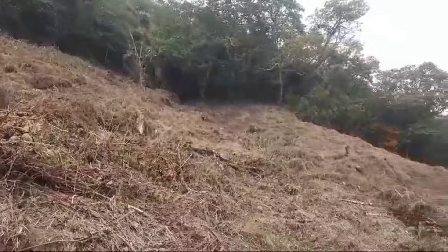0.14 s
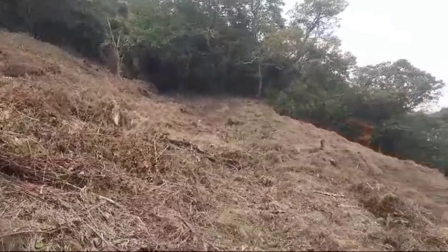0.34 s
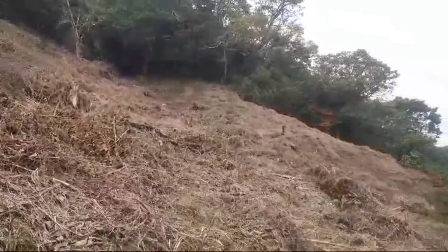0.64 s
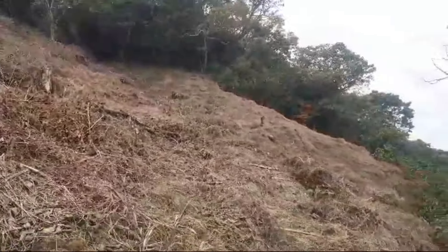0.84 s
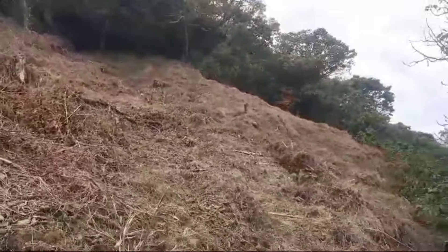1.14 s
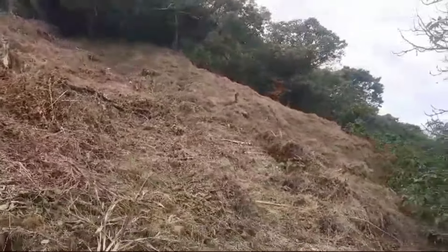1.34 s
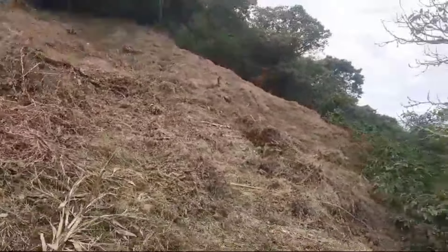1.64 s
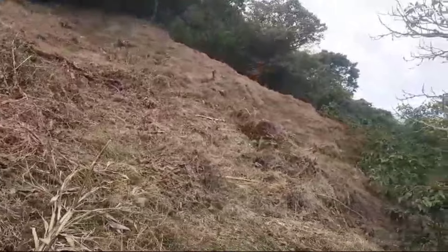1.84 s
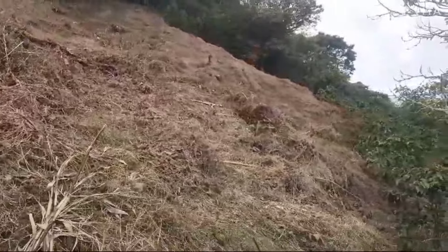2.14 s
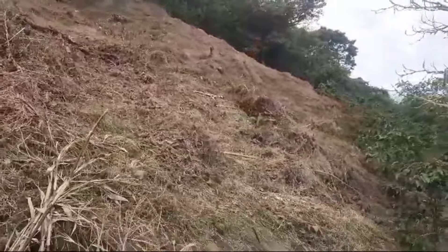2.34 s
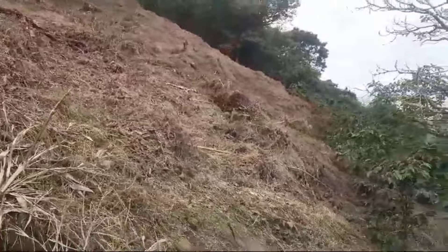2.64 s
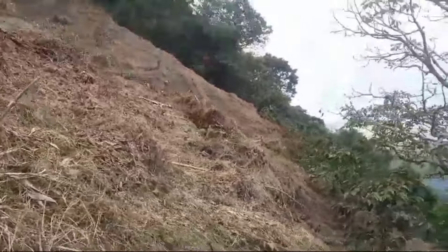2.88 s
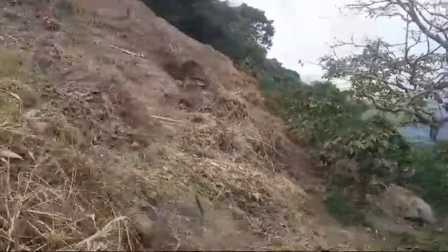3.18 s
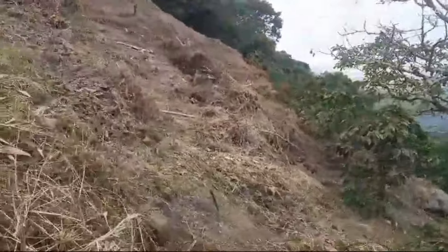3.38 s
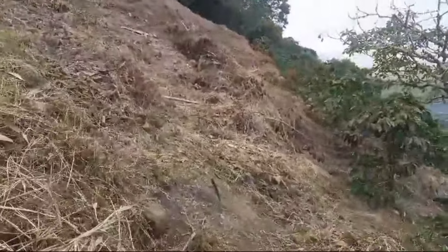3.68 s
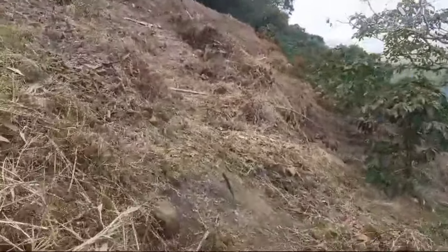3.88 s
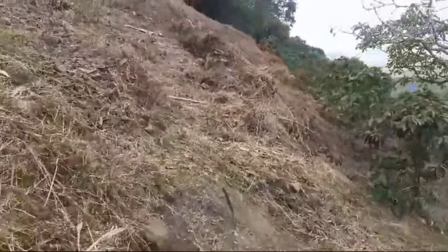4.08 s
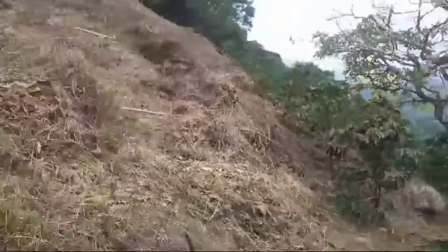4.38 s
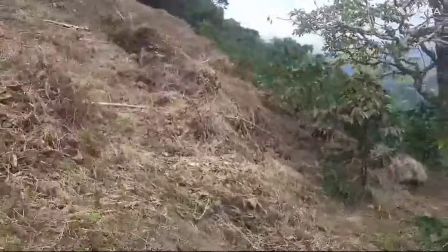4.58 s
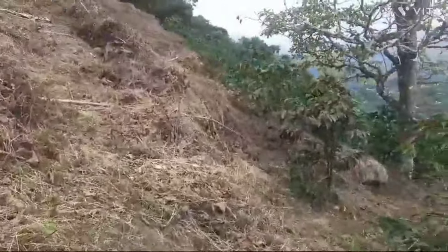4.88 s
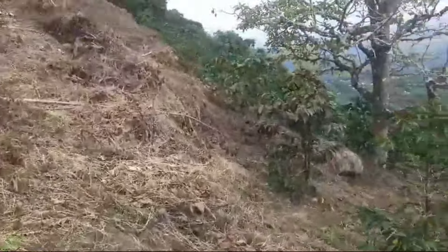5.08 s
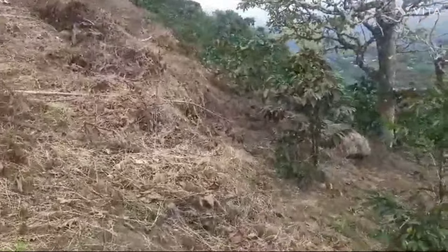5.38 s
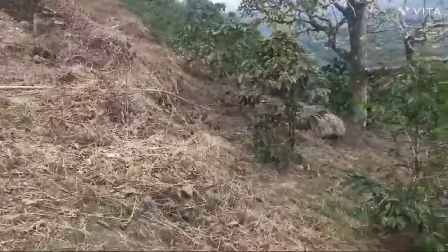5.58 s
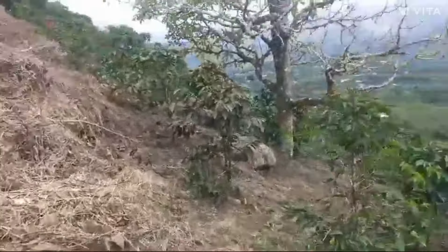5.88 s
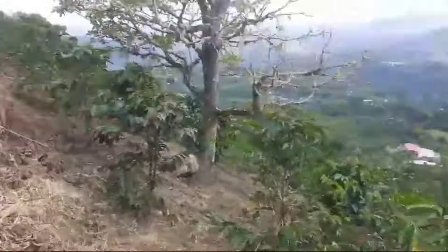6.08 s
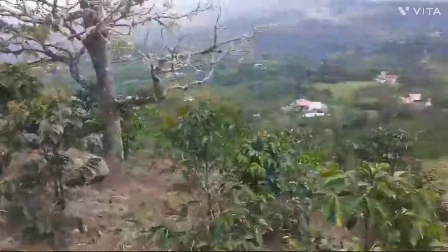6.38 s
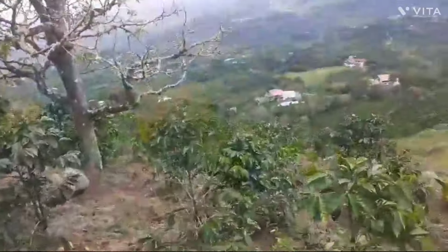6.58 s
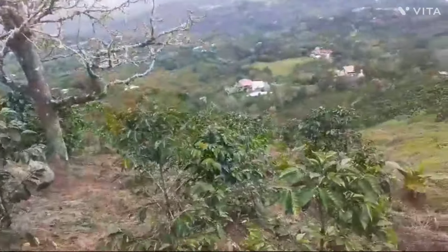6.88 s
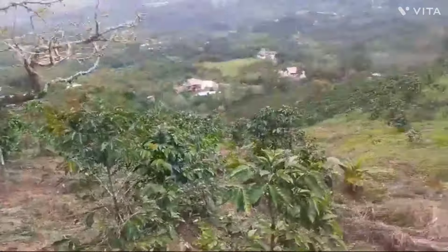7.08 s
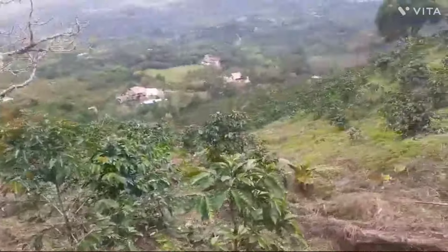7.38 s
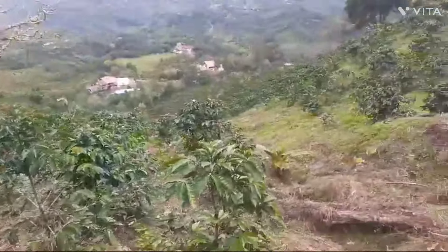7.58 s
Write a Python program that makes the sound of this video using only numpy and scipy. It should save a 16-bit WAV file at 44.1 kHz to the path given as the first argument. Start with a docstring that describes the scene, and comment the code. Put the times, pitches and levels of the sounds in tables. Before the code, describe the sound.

Someone pushes through cut, dead brush on an open hillside, very close to a phone's stereo microphones. Dull wind rumbles and pops come first, leaning right, with small crackles. A sharp, bright surge of twig snaps and crunching follows, then another short crunch and near quiet. Later the grip shifts: hollow taps and thuds on the case, skin rubbing and short rasps over sparse leaf rustle. No room echo.

```python
"""Dry cut brush crackles in surges as someone wades through it on an open hillside, phone in hand.
Random tiny breaks make the crackle; filtered bursts make snapping twigs and crunching bundles.
Wind, made of dull shaped noise and pops, buffets the right microphone at first.
Later the hand shifts its grip: knocks ring the phone's case and shake it, and fingers rub and rasp.
Dry blades swish, faint thin tones hang in a lull, and soft background noise lies under it all."""
import sys
import numpy as np
from scipy import signal
from scipy.fft import rfft, irfft, next_fast_len
from scipy.io import wavfile
from scipy.ndimage import uniform_filter1d

SR = 44100
rng = np.random.default_rng(int(sys.argv[2]) if len(sys.argv) > 2 else 0)


def to_wav(sig):
    """Store sig (one row per channel, or 1-D mono) as 16-bit WAV at the path in sys.argv[1].

    Samples outside -1..1 are clipped; the rate is SR.
    """
    pcm = np.clip(np.atleast_2d(sig), -1, 1) * 32767
    pcm = np.round(pcm).astype(np.int16)
    wavfile.write(sys.argv[1], SR, pcm.T)  # frames by channels


N = 340893
TIME = np.arange(N) / SR


def undb(db):
    """Turn decibels into gain."""
    return 10 ** (np.asarray(db) / 20)


def unit(x):
    """Scale a sound to an rms of one."""
    return x / np.sqrt(np.mean(x ** 2))


def total_db(gains):
    """Level of unrelated sounds heard together: their powers add."""
    return 10 * np.log10(sum(g ** 2 for g in gains) + 1e-12)


def colour(x, table):
    """Shape the tone through (Hz, dB) points, one dB column per channel, without sounding early."""
    hz, *columns = np.transpose(table)
    size = 4096
    log_hz = np.log(np.maximum(np.fft.rfftfreq(size, 1 / SR), 1))
    gains = undb([np.interp(log_hz, np.log(hz), c) for c in columns])
    # folding the cepstrum puts the filter's energy as early as possible
    cepstrum = irfft(np.log(gains))
    cepstrum[:, 1:size // 2] *= 2
    cepstrum[:, size // 2 + 1:] = 0
    response = irfft(np.exp(rfft(cepstrum)))
    return signal.fftconvolve(x, response, axes=-1)[:, :N]


def band(x, hz, kind, order=4):
    """Keep part of the pitch range with a Butterworth filter."""
    return signal.sosfilt(signal.butter(order, hz, kind, fs=SR, output="sos"), x)


def walk(rate):
    """Wander smoothly between random levels, rate of them a second, with a spread near one."""
    k = max(int(SR / rate), 1)
    steps = np.repeat(rng.standard_normal(N // k + 1), k)
    return 1.2 * uniform_filter1d(steps, k)[:N]


def swell(s, length_s, attack_s, release_db_per_s):
    """Gain of one gesture: it rises, holds until its length is over and dies away."""
    gain = np.zeros(N)
    span = slice(max(int(s * SR), 0), int((s + length_s + 1) * SR))
    t = TIME[span] - s
    gain[span] = np.clip(t / attack_s, 0, 1) * undb(-release_db_per_s * np.maximum(t - length_s, 0))
    return gain


def pair(three, likeness):
    """Two microphones hear one shared signal and one of their own each."""
    likeness = np.clip(likeness, 0, 1)
    return np.sqrt(likeness) * three[0] + np.sqrt(1 - likeness) * three[1:]


def add(out, s, sound):
    """Mix a short stereo sound in at time s."""
    start = max(int(s * SR), 0)
    room = out[:, start:start + sound.shape[1]]
    room += sound[:, :room.shape[1]]


def blurred(hz, width_hz):
    """Noise in one narrow band around a pitch, which may move."""
    wobble = band(rng.standard_normal((2, N)), np.clip(width_hz / 2, 5, SR / 4), "lowpass")
    phase = 2 * np.pi * np.cumsum(hz * np.ones(N)) / SR
    return unit(wobble[0] * np.cos(phase) + wobble[1] * np.sin(phase))


# tone of the low rumble: (pitch [Hz], relative level per Hz [dB])
RUMBLE_TONE = [(25, -22), (50, -1.5), (95, 7.5), (160, -5), (230, -11), (330, -15.5), (450, -31.5),
               (700, -48.5), (1100, -74), (3000, -86), (9000, -80)]
# low rumbles on the microphones: wind gusts, then handling of the phone in the last two rows;
# levels are before flutter: (start [s], length [s], left level [dB], right level [dB])
LOW_RUMBLES = [(-0.03, 0.21, -46.5, -25), (0.193, 0.25, -43.5, -23.5), (0.483, 0.15, -37.5, -31),
               (0.698, 0.067, -41.5, -29.5), (0.789, 0.13, -42.5, -22), (0.938, 0.056, -47, -23.5),
               (1.05, 0.096, -53, -38), (1.137, 0.15, -47.5, -24.5), (1.36, 0.11, -47.5, -27),
               (1.544, 0.15, -57, -37.5), (1.77, 0.27, -60, -57), (2.206, 0.065, -92, -40),
               (2.355, 0.045, -84, -43.5), (2.539, 0.055, -68, -40.5), (2.97, 0.17, -61, -49.5),
               (3.109, 0.04, -45.5, -60), (3.216, 0.34, -62.5, -60.5), (4.31, 0.11, -56, -52.5),
               (5.965, 0.4, -63, -53), (6.723, 0.077, -65, -51.5)]
RUMBLE_ATTACK_S, RUMBLE_RELEASE_DB_PER_S = 0.022, 178.5
# the hand shakes the phone at every knock: length, and rumble relative to the knock (left, right)
JOLT_S, JOLT_DB = 0.054, (-51.5, -43)


def wind_and_handling_rumble(eddy_db=2.0, bright=0.57):
    """Gusts, handling and jolts rumble separately at each port; the stronger, the brighter."""
    rumbles = []
    for s, length, *db in LOW_RUMBLES:
        rumbles.append(np.outer(undb(db), swell(s, length, RUMBLE_ATTACK_S, RUMBLE_RELEASE_DB_PER_S)))
    jolts = total_db(undb(db) * swell(s, JOLT_S, RUMBLE_ATTACK_S, RUMBLE_RELEASE_DB_PER_S)
                     for s, db, *_ in CASE_KNOCKS)
    level_db = total_db(rumbles + [np.outer(undb(JOLT_DB), undb(jolts))])
    eddies = rng.standard_normal((2, N)) * undb(eddy_db * walk(55))
    rumble = unit(colour(eddies, RUMBLE_TONE))
    slow = signal.sosfiltfilt(signal.butter(2, 190, fs=SR, output="sos"), rumble)
    # harder gusts carry smaller eddies and so sound brighter
    flutter = (rumble - slow) * undb(bright * (level_db + 38.0))
    return (slow + flutter) * undb(level_db)


# feet and legs pushing through the brush: (start [s], length [s], stalk crackle level [dB],
# litter crunch relative to the stalks [dB], leaf hiss relative to the stalks [dB])
LEG_PUSHES = [(0.0, 0.18, -81.5, -7, -19), (0.85, 0.089, -63, 4, -8), (0.935, 0.14, -57, -9, -4),
              (1.081, 0.17, -61, -2.5, -6), (1.392, 0.33, -63, -4, -9), (1.529, 0.15, -65.5, 1.5, -0.5),
              (1.7, 0.26, -60.5, -8.5, -8), (2.355, 0.064, -67, -9, -9), (2.415, 0.054, -59, -10.5, -7),
              (2.56, 0.25, -65.5, -8, -8), (2.754, 0.062, -61.5, -3, -1.5), (2.78, 0.3, -51, -6, -7),
              (2.94, 0.12, -46, -4, -3.5), (3.1, 0.087, -51, -2, -11), (3.17, 0.15, -47, -3, -1.5),
              (3.301, 0.26, -45, -4, -3), (3.46, 0.099, -44, -7.5, 0.5), (3.63, 0.27, -58.5, -9.5, -23),
              (3.939, 0.29, -65, -8, -26), (4.144, 0.039, -53, 0, -7), (4.205, 0.081, -49, -6, -2),
              (4.3, 0.18, -57, -3, -8), (4.44, 0.31, -67.5, -11.5, -32), (5.065, 0.03, -66.5, -2.5, 1),
              (5.075, 0.16, -68, -3.5, -19), (5.262, 0.082, -61.5, 0, -11), (5.398, 0.15, -75, -2, -15),
              (5.532, 0.051, -58.5, -11.5, -7.5), (5.63, 0.22, -58, -11, -8.5),
              (5.87, 0.26, -64, -7.5, -5.5), (6.079, 0.13, -60, 2.5, -16), (6.239, 0.23, -60.5, 1, -9.5),
              (6.5, 0.19, -65.5, 3, -18), (6.718, 0.048, -62, -3.5, 1.5), (6.82, 0.23, -66.5, -6, -8),
              (7.08, 0.14, -76.5, 9, -25), (7.219, 0.064, -64, 5.5, -9), (7.4, 0.085, -65.5, 5, 1),
              (7.53, 0.063, -55.5, 5.5, -10.5)]
PUSH_RISE, PUSH_RELEASE_DB_PER_S = 0.39, 168  # share of its length spent building up; letting go
BEND_DB, BEND_DB_PER_S = -15, 200.5  # stalks start to bend before each push
SETTLE_DB, SETTLE_DB_PER_S = -10, 44.5  # bent stalks go on settling after each push
STIR_DB, STIR_LEAF_DB = -84.5, -92  # stalks and leaves never come quite to rest


def pushing():
    """Levels of stalks, litter and leaves in dB: each push bends, builds up, lets go and settles."""
    stalks, litter, leaves = [undb(STIR_DB)], [], [undb(STIR_LEAF_DB)]
    for s, length, db, litter_db, leaf_db in LEG_PUSHES:
        push = swell(s, length, PUSH_RISE * length, PUSH_RELEASE_DB_PER_S)
        settle = undb(SETTLE_DB) * swell(s, length, PUSH_RISE * length, SETTLE_DB_PER_S)
        bend = undb(BEND_DB - BEND_DB_PER_S * np.minimum(np.abs(TIME - s), 1))
        gain = undb(db) * np.maximum(np.maximum(push, settle), bend)
        stalks.append(gain)
        litter.append(gain * undb(litter_db))
        leaves.append(gain * undb(leaf_db))
    return total_db(stalks), total_db(litter), total_db(leaves)


def fractures(rate, spread_db, likeness):
    """Tiny breaks at random moments, most small and a few large; rate sets grain, not level."""
    happens = rng.random(N) < rate / SR
    size = undb(spread_db * np.minimum(rng.exponential(size=N), 6)) / np.sqrt(rate)
    return unit(pair(rng.standard_normal((3, N)) * happens * size, likeness))


def thicket(x):
    """Nearby stalks throw back weak early reflections, which change as the walker moves on."""
    t, out, hop = TIME[:SR // 60], x.copy(), SR // 16
    window = np.sqrt(np.bartlett(2 * hop))
    for start in range(0, N - 2 * hop, hop):
        reflections = rng.standard_normal((2, len(t))) * np.exp(-t / .004)
        reflections *= undb(-8) / np.linalg.norm(reflections, axis=1, keepdims=True)
        piece = x[:, start:start + 2 * hop] * window
        add(out, start / SR, signal.fftconvolve(piece, reflections, axes=-1))
    return out


def stalk_bursts(x, per_s, decay_s, burst_db):
    """Single stalks stand out of the crackle, each briefly and around its own pitch."""
    size = next_fast_len(N)
    hz = np.maximum(np.fft.rfftfreq(size, 1 / SR), 1)
    octave = np.clip(np.log2(hz / 800), 0, 3)
    spectrum, out = rfft(x, size), 0
    for centre in np.arange(7) / 2:  # overlapping bands, half an octave apart
        part = irfft(spectrum * np.maximum(1 - 2 * np.abs(octave - centre), 0), size)[:, :N]
        starts = (rng.random(N) < per_s / SR) * rng.uniform(0.12, 0.46, N)
        power = signal.lfilter([1], [1, -np.exp(-1 / (decay_s * SR))], starts + 1e-18)
        out = out + part * np.sqrt(1 + power * undb(burst_db) ** 2)
    return out


SPLINTERS_PER_S = 300
CRACK_LEFT_DB = -11  # left relative to right: set for cracks, the average for splinters


def splinters(low_hz=1300, high_hz=6000, cycles=7, spread_db=3.5, tilt_db=-7):
    """Many thin stems part one by one, each ringing briefly at its own pitch; tilt is per octave."""
    out, t = np.zeros((2, N)), TIME[:SR // 50]
    for when, height, size, side in rng.random((SPLINTERS_PER_S * N // SR, 4)):
        hz = low_hz * (high_hz / low_hz) ** height
        db = -spread_db * np.log(size + .02) + tilt_db * np.log2(hz / low_hz)
        ping = np.sin(2 * np.pi * hz * t) * np.exp(-t * hz / cycles)
        add(out, when * N / SR, np.outer(undb([db + 2 * side * CRACK_LEFT_DB, db]), ping))
    return unit(out)


# tone of the brush: (pitch [Hz], relative left level per Hz [dB], relative right level per Hz [dB])
BRUSH_TONE = [(173, -10, -2), (335, -2.5, 5), (443, -5, -1), (720, -6, 0.5), (1290, -12.5, 0.5),
              (2200, -26, 2), (3520, -25, -3.5), (4010, -29, -12.5), (4980, -23, -13.5), (8330, -35, -39),
              (9700, -50.5, -38), (11640, -30, -30), (15000, -32.5, -21.5)]


def brush(rate=4000, patchy_db=-1.1, sizzle_db=-9.0, splinter_db=-7):
    """Litter crunches, stalks crackle and leaves hiss; the harder the push, the more fibres break."""
    stalk_db, litter_db, leaf_db = pushing()
    breaks = rate * undb(.25 * (stalk_db + 52))  # per second
    catches = undb(patchy_db * walk(110) + walk(25))  # stalks catch and let go
    litter = colour(fractures(breaks, 0.35, 0.94), BRUSH_TONE)
    crunch = unit(band(litter, [200, 900], "bandpass")) * undb(litter_db)
    # thick stalks break one by one among the many thin fibres
    snaps = undb(-10) * fractures(110, 1.2, .8)
    fibres = thicket(colour(fractures(breaks, 0.57, 0.25) + snaps, BRUSH_TONE))
    stalks = stalk_bursts(fibres, per_s=24, decay_s=.009, burst_db=4)
    crackle = unit(band(stalks, [900, 4400], "bandpass")) + undb(splinter_db) * splinters()
    crackle = crackle * undb(stalk_db) / np.hypot(1, undb(splinter_db))
    leaves = colour(fractures(2 * breaks, 0.9, 0.96), BRUSH_TONE)
    hiss = unit(band(leaves, 7430, "highpass", order=6)) * undb(leaf_db)
    # fine fibres sizzle when both stalks and leaves move
    fizz_db = (stalk_db + leaf_db) / 2 + sizzle_db + 2 * walk(45)
    sizzle = unit(band(leaves, [4000, 7500], "bandpass")) * undb(fizz_db)
    return catches * (crunch + crackle + sizzle + hiss)


# tone of the still air over the valley and microphone hiss:
# (pitch [Hz], relative left level per Hz [dB], relative right level per Hz [dB])
AIR_TONE = [(29.8, -21, -15.5), (104.1, -5, 8), (192, -14.5, -9), (340, -8.5, -1), (417, -23, -18.5),
            (806, -23.5, -16.5), (1500, -35, -28.5), (3040, -35, -31.5), (5770, -39, -47), (9800, -37, -34),
            (14000, -30.5, -32.5)]
AIR_DB = -66.5


def air(swell_db=0.4):
    """A quiet, gently swelling background of shaped noise, largely shared by both microphones."""
    hush = colour(pair(rng.standard_normal((3, N)), 0.69), AIR_TONE)
    return unit(hush) * undb(AIR_DB + swell_db * walk(17.0))


# a click as the sound begins, then single eddies popping on the right port: (time [s], peak level [dB])
PORT_POPS = [(0.01, -16), (0.084, -20.5), (0.226, -32.5), (0.436, -36), (1.169, -22.5), (1.284, -19.5),
             (1.375, -25), (1.475, -22), (1.544, -27.5), (1.596, -25.5), (1.65, -31), (1.688, -27),
             (1.732, -34.5)]


def pops(decay_s=0.002, leak_db=-26):
    """A dull pop of a cycle or two on the right, faint on the left: the opening click, then lone eddies
    crossing the port."""
    out, t = np.zeros((2, N)), TIME[:SR // 25]
    for s, db in PORT_POPS:
        hz = 300 * np.exp(0.14 * rng.standard_normal())
        pop = np.sin(2 * np.pi * hz * t) * t * np.exp(-t / decay_s)
        add(out, s, np.outer([undb(leak_db), 1], pop / np.abs(pop).max()) * undb(db))
    return out


def crack(excitation, db, hz, octaves):
    """Dry wood rings in a band around its pitch, mostly on the right."""
    edges = np.minimum(hz * 2 ** (np.array([-octaves, octaves]) / 2), .45 * SR)
    sound = band(excitation, edges, "bandpass", order=3)
    sound = sound / np.abs(sound).max(axis=1, keepdims=True)
    return sound * undb(db + np.array([[CRACK_LEFT_DB], [0]]))


# bundles of stalks or leaves giving way in a quick run of breaks:
# (start [s], length [s], right peak level [dB], pitch [Hz])
BUNDLE_CRUNCHES = [(0.083, 0.012, -58, 3000), (0.966, .02, -49, 1900), (1.0, 0.041, -46, 2000),
                   (1.154, 0.024, -54, 2580), (1.322, 0.028, -63.5, 5000), (1.461, 0.049, -51.5, 2100),
                   (1.517, 0.015, -45, 1900), (1.573, 0.036, -41.5, 1880), (1.653, 0.056, -49, 2360),
                   (1.858, 0.023, -49.5, 1800), (2.423, 0.0091, -48.5, 2240), (2.453, 0.03, -47.5, 1900),
                   (2.765, 0.012, -51, 1000), (2.965, 0.011, -28.5, 2570), (3.03, 0.039, -29.5, 2060),
                   (3.278, 0.017, -33, 2000), (3.497, 0.018, -27, 2640), (3.549, 0.051, -34, 1740),
                   (4.151, 0.01, -45, 1600), (4.170, 0.0084, -39, 2320), (4.255, 0.009, -34, 1480),
                   (5.086, 0.0085, -47.5, 13400), (7.563, 0.028, -48.5, 4500)]
CRUNCH_BREAKS_PER_S, CRUNCH_OCTAVES = 550, 1.29  # how often it breaks; width of its pitch band


def crunches(release_s=0.0044):
    """A bundle gives way: a first break leads a random run of others, which soon dies out."""
    out, t = np.zeros((2, N)), TIME[:SR // 8]
    for s, length, db, hz in BUNDLE_CRUNCHES:
        breaks = (rng.random(len(t)) < CRUNCH_BREAKS_PER_S / SR) * rng.uniform(.3, 1, len(t))
        breaks[0] = 1
        power = signal.lfilter([1], [1, -np.exp(-1 / (.001 * SR))], breaks)  # each break fades fast
        run = np.sqrt(power) * np.exp(-np.maximum(t - length, 0) / release_s)
        noise = pair(rng.standard_normal((3, len(t))), 0.2)
        add(out, s, crack(noise * run, db, hz, CRUNCH_OCTAVES))
    return out


# twigs breaking: (time [s], right peak level [dB], pitch [Hz], width [octaves])
TWIG_SNAPS = [(0.665, -62.5, 2480, 0.44), (0.824, -52.5, 2800, 3.5), (0.859, -51, 2200, 1.3),
              (0.883, -38.5, 3000, 2.3), (2.2034, -52.5, 2310, 0.63), (2.373, -56, 3600, 2.5),
              (2.663, -48, 3800, 1.4), (3.0113, -29.5, 2560, 1.2), (3.062, -34, 1980, 1.7),
              (3.126, -48, 3000, 0.7), (3.2874, -29.5, 1910, 3.1), (3.492, -23.5, 2840, 1.6),
              (3.5475, -30, 2200, 2.5), (4.262, -40, 1700, 2.2), (4.284, -37, 1800, 2.3),
              (4.396, -45, 1806, 1.4), (4.616, -47.5, 3260, 0.45), (4.629, -56, 3000, 0.4),
              (4.685, -54, 2980, 0.45), (5.546, -53, 1800, 1.8), (7.469, -46, 2600, 0.92)]


def twigs(splinter_db=-14):
    """Each twig cracks around its own pitch, then splinters briefly."""
    out, t = np.zeros((2, N)), TIME[:SR // 20]
    fade = np.exp(-t / .0009) + undb(splinter_db) * np.exp(-t / .008)
    for s, db, hz, octaves in TWIG_SNAPS:
        noise = pair(rng.standard_normal((3, len(t))), 0.59)
        add(out, s, crack(noise * fade, db, hz, octaves))
    return out


# tone of skin on the case: (pitch [Hz], relative left level per Hz [dB], relative right level per Hz [dB])
SCRAPE_TONE = [(121, -22.5, -10.5), (250, -16, -19), (339.6, 14.5, 15), (516, -8, -3.5), (800, -2.5, -3.5),
               (1052, -2, -0.5), (1840, -7.5, -11), (2940, -19.5, -38.5), (4200, -24, -53),
               (7100, -28, -71.5), (9670, -45.5, -57), (13900, -23.5, -36.5)]
# fingers sliding on the case: (start [s], length [s], level [dB])
FINGER_RUBS = [(2.754, 0.021, -51), (3.207, 0.091, -51), (3.335, 0.17, -47.5), (5.059, 0.075, -62),
               (5.634, 0.076, -66), (5.984, 0.37, -63.5), (6.103, 0.26, -79.5), (7.328, 0.197, -50.5),
               (7.51, 0.075, -49.5), (7.563, 0.084, -45)]
RUB_ATTACK_S, RUB_RELEASE_DB_PER_S = 0.024, 386


def scrape(rate=2500, patchy_db=4.5):
    """Skin sticks and slips on the case, in many tiny random releases."""
    slips = fractures(rate, 2.5, 0.54) * undb(patchy_db * walk(100))
    slips = unit(colour(slips, SCRAPE_TONE))
    rub_db = total_db(undb(db) * swell(s, length, RUB_ATTACK_S, RUB_RELEASE_DB_PER_S)
                      for s, length, db in FINGER_RUBS)
    return slips * undb(rub_db)


# faint thin tones that hang in the lull: (pitch [Hz], level before the left and right shifts [dB])
THIN_TONES = [(1570, -82.5), (1970, -87), (2589, -91), (2860, -88.5)]


def tones(width_hz=45, left_db=-6, right_db=3):
    """Faint tones, blurred into narrow bands of noise, fade in and out."""
    fade = np.interp(TIME, [3.9, 4.3, 5.2, 5.7], [0, 1, 1, 0])
    whine = sum(undb(db) * blurred(hz, width_hz) for hz, db in THIN_TONES)
    return np.outer(undb([left_db, right_db]), whine * fade)


# ways the case rings: (pitch [Hz], time to fall 60 dB in a loose grip [s],
# relative left level [dB], relative right level [dB])
CASE_MODES = [(105.7, 0.11, -48.5, -24.5), (282, 0.016, -34.5, -5), (364.5, 0.021, -10, -15.5),
              (359.6, 0.05, -8, -14), (712, 0.0068, 7, 9), (771.5, 0.00574, 11, 15),
              (858.5, 0.0034, 3.5, 13.5), (3000, 0.0022, -23.5, -4), (5210, 0.01, -40, -17),
              (13000, 0.0073, -38, -5)]
# knocks on the case: (time [s], peak level of the louder channel, before buzz [dB],
# contact softness [1/kHz], added left minus right level [dB], ring time relative to a loose grip [ratio])
CASE_KNOCKS = [(4.4209, -31, 2.1, -6.5, 0.62), (5.1875, -32, 10.5, -8, 1), (5.3013, -22.5, 1.05, 0.5, 0.99),
               (5.654, -36.5, 0.67, -1.5, 1.15), (5.697, -41, 0.4, -1, 1.7), (6.049, -38, 7, -27, 0.94),
               (6.111, -32.5, 2.2, -1.5, 1.1), (6.1767, -15.5, 1.84, 2.5, 1.07),
               (6.3251, -19.5, 2.3, -1.5, 1.1), (6.4399, -15, 0.78, 2, 0.93),
               (6.6227, -14.5, 0.61, 1, 1.34), (6.6242, -11.5, 2.1, -10, 0.45),
               (7.0155, -16, 0.35, 5.5, 0.97), (7.0193, -8.5, 0.78, -3.5, 0.93), (7.222, -19, 0.89, 4, 1.4),
               (7.2275, -6.5, 0.51, -5.5, 0.96), (7.3295, -24.5, 2.5, 15, 0.8), (7.4092, -18, 1.08, 0, 1.1),
               (7.4175, -27, 0.66, 4, 1.2), (7.492, -41, 0.79, 1, 1.2), (7.6837, -29, 4, 13, 1.25),
               (7.7179, -15.5, 0.37, 9, 0.71), (7.7208, -5.5, 0.67, -5.5, 1.03)]
# knocks harder than HEAVY_DB shove the whole phone: dB of bass per dB of knock, below this pitch
HEAVY_DB, HEAVY_SLOPE, HEAVY_HZ = -11.5, 1, 210


def knocks(left_ms=0.536, lead_ms=0.45, place_db=0.5, grit_db=-37, grit_s=0.0044,
           chatter_db=-58, chatter_s=0.03, buzz_db=-25):
    """A short push rings the case; the softer and longer the contact, the duller the knock."""
    out, t = np.zeros((2, N)), TIME[:SR // 6]
    hz, t60, *mode_db = np.transpose(CASE_MODES)
    weights = undb(mode_db) * (-1) ** np.arange(len(hz))  # neighbouring modes swing against each other
    khz = np.fft.rfftfreq(len(t), 1 / SR) / 1000
    # a bending wave reaches the far, left port upside down, its low pitches last (travel time at 1 kHz)
    far = -np.exp(-4j * np.pi * left_ms * np.sqrt(khz))
    near = np.exp(-2j * np.pi * khz * lead_ms)
    travel = np.array([far, near])
    for s, db, softness, pan_db, ring_share in CASE_KNOCKS:
        grip = 1 + .022 * rng.standard_normal()  # shifts the pitch a little
        decay = np.exp(-np.log(1000) * t / (ring_share * t60[:, None]))
        modes = np.sin(2 * np.pi * np.outer(hz * grip, t)) * decay
        # each knock favours slightly different pitches
        uneven = np.interp(np.sqrt(khz), np.linspace(0, 3, 12), rng.standard_normal(12))
        shove_db = HEAVY_SLOPE * max(db - HEAVY_DB, -2)  # softer knocks lose at most 2 dB of bass
        shove = undb(shove_db / (1 + (1000 * khz / HEAVY_HZ) ** 6))
        place = undb(place_db * uneven) * shove
        # the finger skids as it lands, then chatters faintly as it settles
        skid = undb(grit_db) * np.exp(-t / grit_s) + undb(chatter_db) * np.exp(-t / chatter_s)
        push = (1 + rfft(skid * rng.standard_normal(len(t)))) / (1 + 1j * khz * softness) ** 2
        ring = irfft(rfft(weights @ modes) * push * place * travel)
        ring = ring * undb(np.array([[pan_db], [-pan_db]]) / 2)
        ring = ring / np.abs(ring).max() * np.minimum((t[-1] - t) / t[-1] * 2, 1)
        # the seams of the case buzz on the widest swings, more so under hard knocks
        buzz = unit(band(rng.standard_normal(len(t)), [1800, 4200], "bandpass")) * ring ** 4
        add(out, s - lead_ms / 1000, (ring + buzz * undb(buzz_db + db / 2)) * undb(db))
    return out


# dry blades sliding past the legs: (start [s], length [s],
# level before flicker and left-right shift [dB], starting pitch [Hz], width [Hz])
BLADE_SWISHES = [(5.547, 0.023, -60.5, 1570, 180), (6.724, 0.032, -67, 4880, 1400),
                 (7.416, 0.062, -71, 5440, 1900)]
# share of its length spent building up; dying away; climb in pitch
SWISH_RISE, SWISH_RELEASE_DB_PER_S, SWISH_OCTAVES_PER_S = 0.41, 355, 2.5


def swishes(patchy_db=1.0, left_db=4.5):
    """A dry blade slides past: a scratchy band that climbs as it speeds up."""
    out = 0
    for s, length, db, hz, width_hz in BLADE_SWISHES:
        pitch = hz * 2 ** (SWISH_OCTAVES_PER_S * np.clip(TIME - s, 0, length))
        gain = undb(db) * swell(s, length, SWISH_RISE * length, SWISH_RELEASE_DB_PER_S)
        out = out + blurred(pitch, width_hz) * gain
    return np.outer(undb([left_db, -left_db]), out * undb(patchy_db * walk(300)))


# a fingertip pressed hard enough to rasp:
# (start [s], length [s], level before the left-right shift [dB], typical slips [per s])
FINGER_RASPS = [(7.519, 0.05, -45, 840), (7.563, 0.021, -59, 1350), (7.624, 0.02, -48.5, 780)]
RASP_RELEASE_DB_PER_S = 1204


def rasps(jitter=0.11, rise=0.88, left_db=3.0):
    """Skin slips in a quick, uneven train of pulses that swells and stops short."""
    out, t = np.zeros((2, N)), TIME[:SR // 6]
    for s, length, db, rate in FINGER_RASPS:
        wobble, size = rng.standard_normal((2, 400))
        at = (np.cumsum(np.exp(jitter * wobble)) / rate * SR).astype(int)
        slips = np.bincount(at, undb(2 * size), len(t))[:len(t)]
        rasp = band(slips, [650, 1500], "bandpass", order=2)
        rasp = unit(band(rasp, 1050, "lowpass", order=1))
        release = undb(-RASP_RELEASE_DB_PER_S * np.maximum(t - length, 0))
        gain = np.minimum(t / (rise * length), 1) * release
        add(out, s, np.outer(undb([db + left_db, db - left_db]), rasp * gain))
    return out


def scene():
    """Open air: no room surrounds the sources, which simply add up."""
    weather = wind_and_handling_rumble() + air() + pops() + tones()
    plants = brush() + crunches() + twigs() + swishes()
    fingers = scrape() + knocks() + rasps()
    return weather + plants + fingers


TOP_HZ = 15900


def record(dry):
    """The phone thins the deepest bass and cuts the top."""
    thinned = band(dry, 42, "highpass", order=3)
    return signal.sosfilt(signal.ellip(10, .2, 70, TOP_HZ, fs=SR, output="sos"), thinned)


dry = scene()
out = record(dry)
to_wav(out)
```